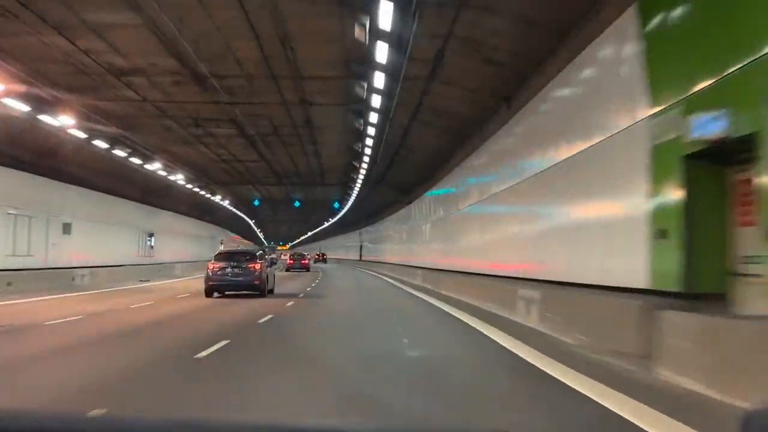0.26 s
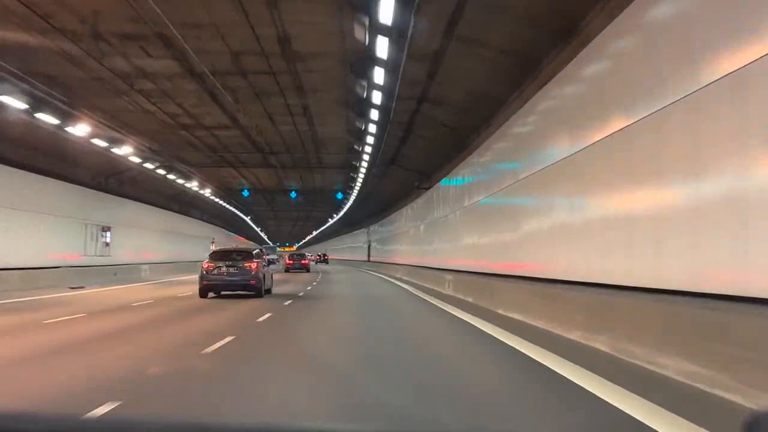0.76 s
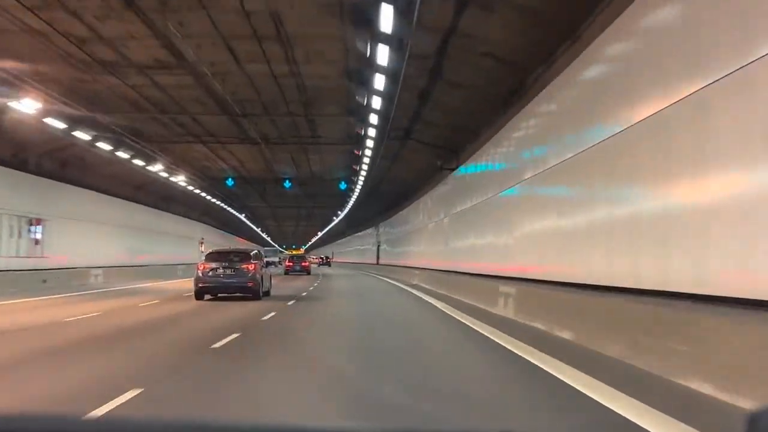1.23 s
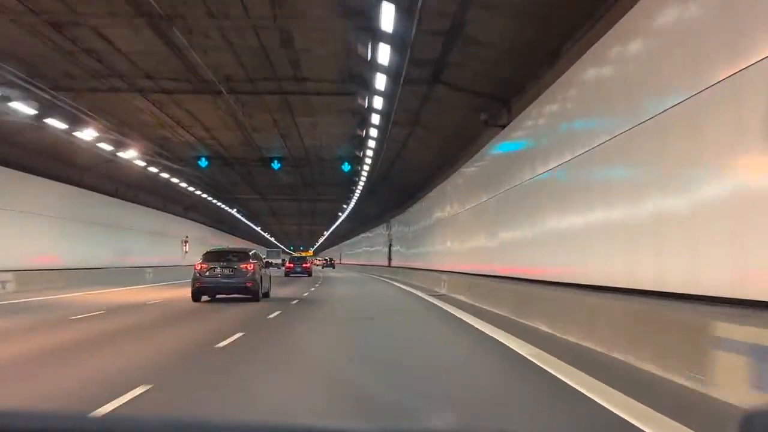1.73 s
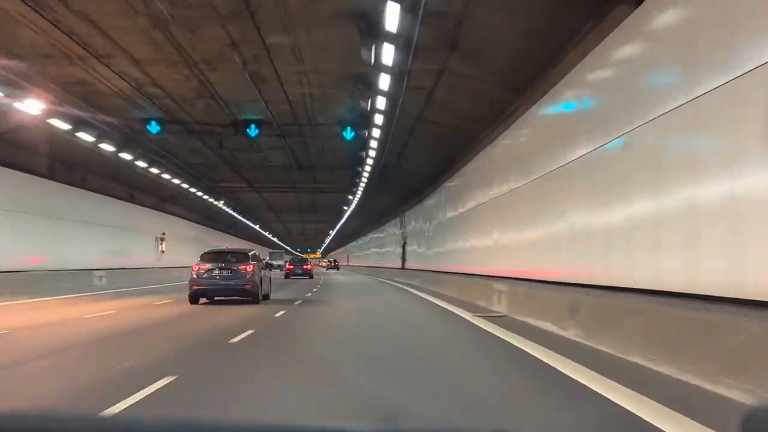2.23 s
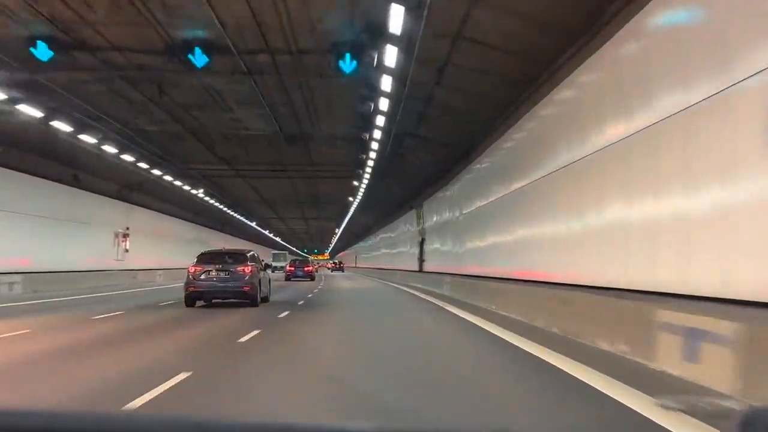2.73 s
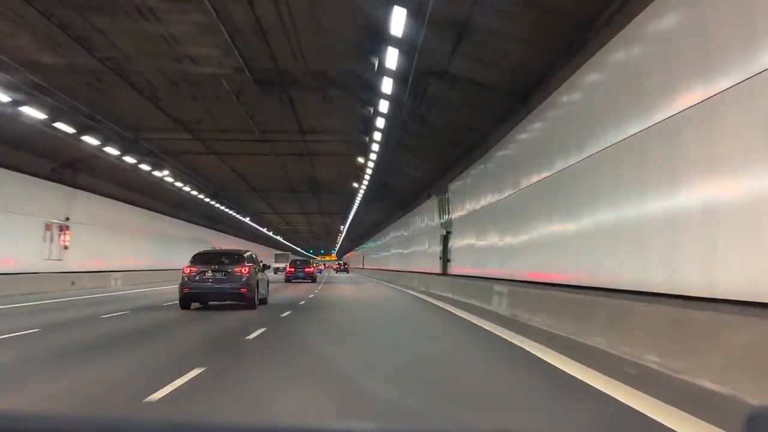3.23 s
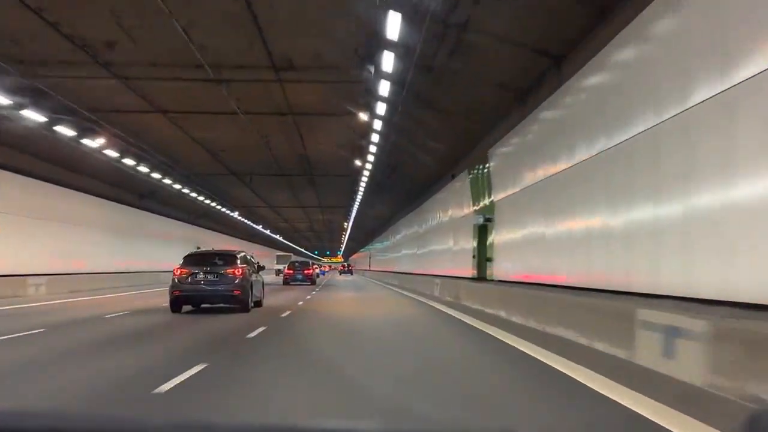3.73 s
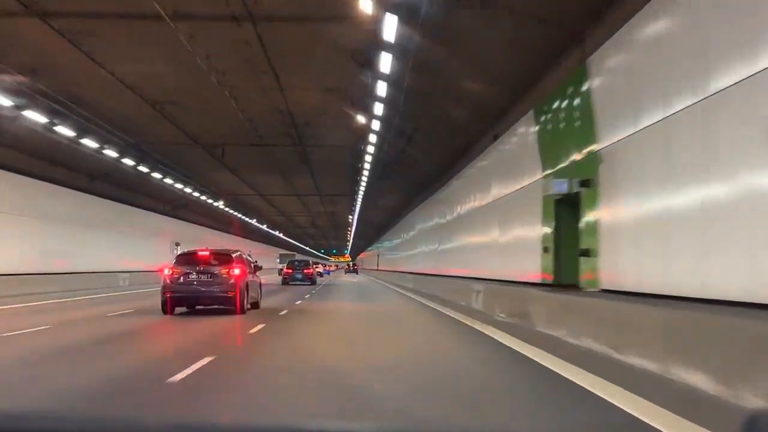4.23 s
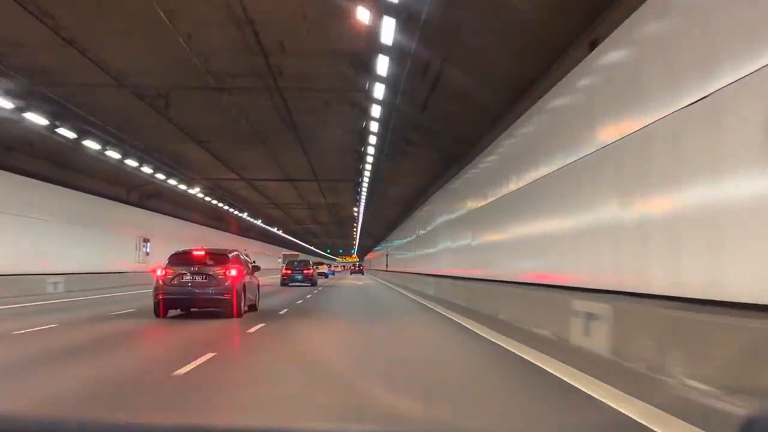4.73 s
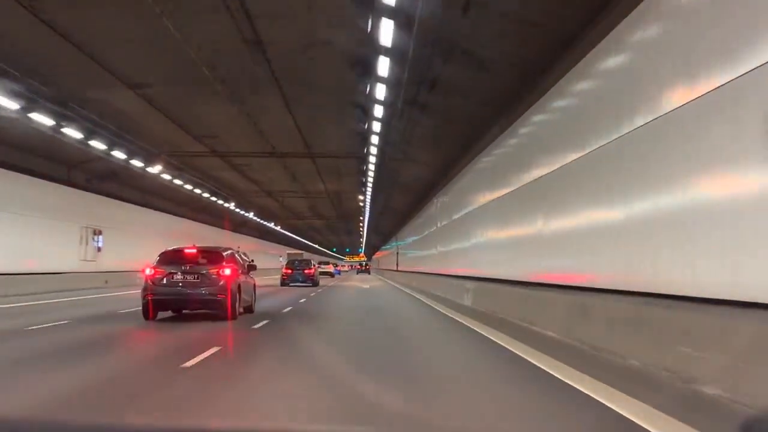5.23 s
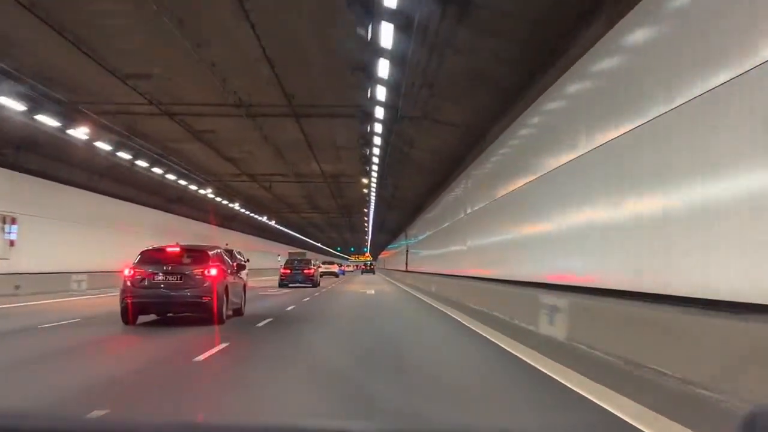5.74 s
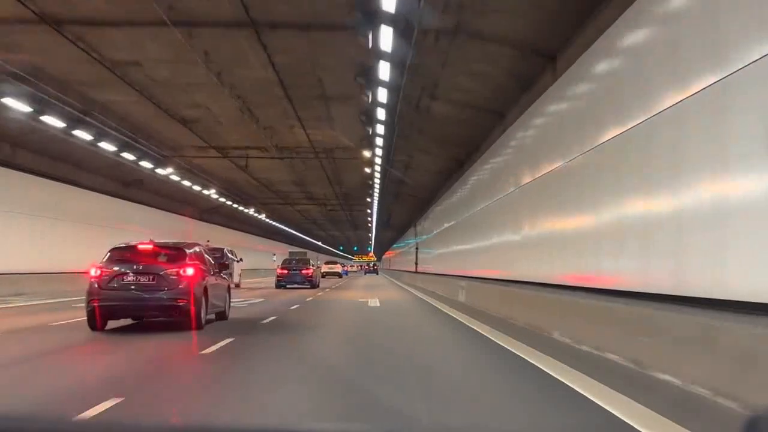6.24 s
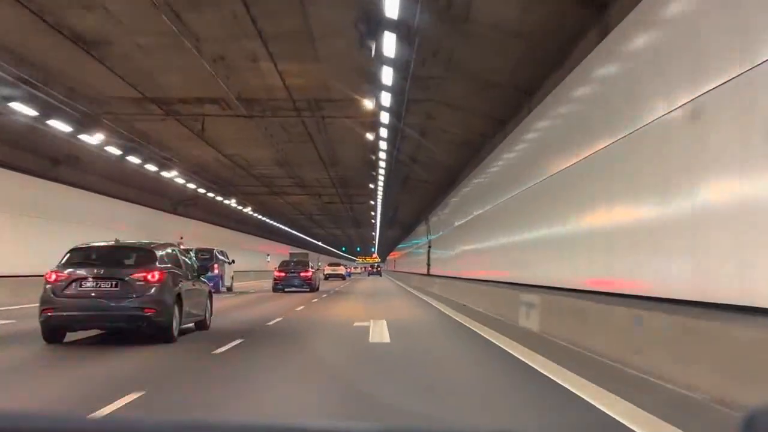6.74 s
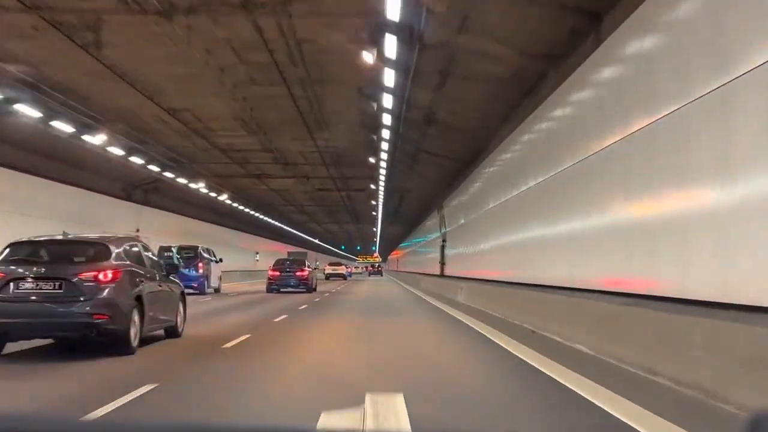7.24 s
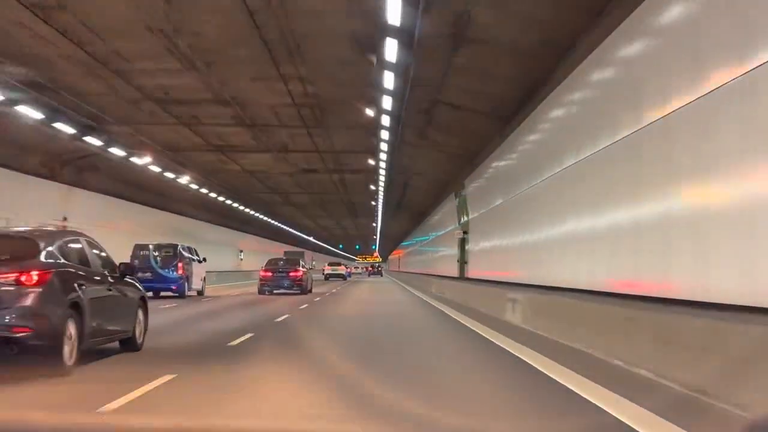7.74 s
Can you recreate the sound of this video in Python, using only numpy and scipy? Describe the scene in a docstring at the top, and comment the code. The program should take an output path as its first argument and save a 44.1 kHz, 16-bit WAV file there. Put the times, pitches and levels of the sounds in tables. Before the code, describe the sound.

Heard in stereo from inside a car driving through a tunnel: a deep, uneven tyre rumble with frequent soft thumps, a low engine drone that is strong at first and then comes and goes, and a deep cabin boom. Quieter tyre roar and windscreen air surround it. A faint thin hiss swells and drops; trim ticks softly near the five-second mark, and the hardest bump comes near the end.

```python
"""Inside a car cruising through a road tunnel, heard in stereo from within the cabin, about 8 s.
From the start rough asphalt gives a low rumble with soft thumps, over a droning engine and a cabin boom;
tyre roar enters through the glass and air rushes past the windscreen. The drone, strong at first, comes and goes.
A thin high hiss (likely the air conditioning) is faint, swells from about 3 s, and drops and returns.
Near 5 s the trim ticks softly; the hardest bump lands near 7.4 s. Noise, sines and ringing modes make it all.
"""
import sys
import numpy as np
from scipy import signal
from scipy.fft import rfft, irfft
from scipy.io import wavfile
from scipy.ndimage import uniform_filter1d

SR = 44100
rng = np.random.default_rng(int(sys.argv[2]) if len(sys.argv) > 2 else 0)


def dump(signal):
    """Clip the signal to [-1, 1] and save it as 16-bit WAV at the path in sys.argv[1]."""
    limited = np.clip(np.atleast_2d(signal).T, -1, 1)
    pcm = np.round(limited * 32767).astype(np.int16)
    wavfile.write(sys.argv[1], SR, pcm)


N = 351477
T = np.arange(N) / SR
FREQ = np.arange(N // 2 + 1) * SR / N + 1e-3  # just above zero, so that its logarithm exists
SIDES = np.array([[1], [-1]])  # left, right

# Colour of the rumble, from the suspension and from the body panels: f/Hz, relative density/dB
SUSPENSION_COLOUR = [(8, -45), (22, -28), (32, -12), (46, -1.5), (60, -1.5), (73, 1), (85, -.5),
                     (100, -2.8), (128, -4), (170, -16), (260, -40), (800, -110)]
PANEL_COLOUR = [(20, -53.5), (80, -19), (125, -8.5), (155, -2), (210, -1.5), (260, -4), (320, -8.5),
                (400, -14.5), (500, -21.5), (650, -38), (1200, -71.5), (3000, -110)]
# Rumble on ordinary asphalt; the tyres take a moment to roll on to a stretch or off it
SUSPENSION_DB, PANEL_DB, ROLL_ON_S = -19, -26.5, 0.029
# Coarser or smoother asphalt: start t/s, length/s, extra suspension level/dB, extra panel level/dB
ASPHALT_STRETCHES = [(0.0, 0.24, 1.5, 0.5), (.31, 0.05, -5, -0.5), (0.584, 0.093, -3.5, -1),
                     (0.74, 0.18, 2.5, 1), (.96, 0.49, -1, 0.5), (1.572, .07, -7, 1), (1.78, 0.46, 1, .5),
                     (2.534, 0.043, -3, -4), (2.71, 0.23, 1, 0.5), (2.969, 0.049, -13, -2.5),
                     (3.05, 0.11, 0.5, -2.5), (3.754, 0.058, -7, -1.5), (3.903, 0.34, 0, 1.5),
                     (4.394, 0.059, -2.5, -1), (4.74, .05, -3, -1), (4.79, 0.044, 5.5, -1),
                     (4.962, 0.185, 4, 0), (5.153, 0.15, -4, -1.5), (5.453, 0.18, 0, 1),
                     (5.817, 0.34, 1, 0), (6.072, .12, -5.5, -0.5), (6.255, 0.56, 0, 1),
                     (6.895, 0.43, -1, -1), (7.368, 0.077, -6.5, 0.5), (7.657, 0.064, -2.5, -0.5)]
# Bumps in the asphalt: t/s, peak level before gain/dB, relative sharpness/dB
ASPHALT_BUMPS = [(0.034, -15, -17.5), (0.075, -16.5, -11), (0.129, -18, -20), (0.257, -15, -24),
                 (0.39, -16.5, -5), (0.519, -12, -21), (0.544, -14, -7), (0.718, -18.5, -7),
                 (0.828, -14.5, -19), (1.093, -12, -15.5), (1.165, -23, -5.5), (1.498, -17, -12.5),
                 (1.785, -14, -19), (1.81, -15, -15), (1.933, -19, -21), (2.053, -16, -29.5),
                 (2.128, -16.5, -24.5), (2.171, -14.5, -13.5), (2.437, -13.5, -27.5), (2.531, -15.5, -16),
                 (2.626, -13.5, -24), (2.804, -16.5, -24), (2.914, -15.5, -23), (3.023, -19, -17.5),
                 (3.142, -16, -23.5), (3.251, -15.5, -14), (3.427, -14.5, -29), (3.483, -18, 1),
                 (3.665, -17.5, -6), (3.693, -17.5, -22.5), (3.945, -16, -13), (4.002, -16, -8),
                 (4.092, -13.5, -23), (4.193, -15, -21.5), (4.252, -16, -15.5), (4.442, -16, -24.5),
                 (4.532, -17.5, -4.5), (4.679, -17.5, -23), (4.832, -21, -25.5), (4.895, -18.5, -4.5),
                 (4.98, -17.5, -14), (5.071, -13.5, -18), (5.124, -16.5, -25), (5.184, -14, -24.5),
                 (5.283, -14, -16.5), (5.518, -15, -22), (5.617, -17, -23.5), (5.944, -17, -4.5),
                 (6.198, -16, -26.5), (6.244, -16.5, -17), (6.275, -14.5, -13.5), (6.457, -16.5, -10.5),
                 (6.564, -12, -23.5), (6.684, -17, -4.5), (6.943, -14, -2.5), (7.054, -21, 0.5),
                 (7.085, -13.5, -25), (7.186, -18, -14), (7.195, -11, -23), (7.274, -14, -24),
                 (7.419, -7.3, -9.5), (7.556, -15.5, -5), (7.638, -13.5, -17), (7.832, -16, -25)]
# Damped modes of the car body, before detuning and tilt: f/Hz, 60 dB decay time/s, level/dB
BODY_MODES = [(98, 0.07, -9.5), (150.3, 0.059, 2), (203.6, 0.073, 0), (271.7, 0.041, -1.5),
              (366.5, 0.042, -5), (496, 0.03, -15), (620, 0.037, -28)]
# Humps that jolt the suspension: t/s, level before gain/dB, swing f/Hz
ROAD_HUMPS = [(0.165, -15, 73.4), (0.25, -10, 72.7), (0.381, -14, 73.4), (0.744, -12, 94.2),
              (0.816, -7, 74), (2.062, -17, 86.1), (2.327, -9, 96), (2.434, -8, 71), (2.736, -10, 100.5),
              (2.841, -12, 83), (3.941, -11, 72.7), (3.993, -12, 87), (4.107, -10, 121),
              (4.363, -11.5, 113), (4.785, -8.5, 110), (4.829, -12, 88.8), (4.974, -7, 72.7),
              (5.488, -8, 71), (5.831, -10.5, 105), (5.9, -16, 104), (5.944, -12, 88), (6.313, -7, 85),
              (6.362, -8, 72), (6.545, -15, 84), (6.758, -12, 96), (6.968, -11, 105), (7.083, -9.5, 96),
              (7.332, -12.5, 96), (7.876, -11.5, 105)]
HUMP_RISE_S = 0.016  # from the start of a jolt to its fullest swing
# Engine drone: t/s, level before gain and throb/dB
ENGINE_LEVEL = [(0, -14.5), (.55, -17), (.64, -24), (.8, -17), (.98, -12.5), (1.13, -17.5), (1.3, -15),
                (1.58, -14), (1.72, -26), (2.05, -26.5), (2.2, -16.5), (2.65, -26), (2.9, -16.5),
                (3.02, -26.5), (3.55, -19), (3.72, -41), (4.3, -20), (4.85, -23.5), (5.12, -14),
                (5.17, -31), (5.46, -13), (5.8, -28), (6.03, -16), (6.25, -24.5), (6.7, -20.5),
                (7.2, -21.5), (7.5, -27), (7.97, -24.5)]
# Firing rate of the engine: t/s, f/Hz
ENGINE_PITCH = [(0, 62.5), (.6, 62.2), (1, 60.8), (1.45, 60.5), (1.7, 58.5), (2.2, 62), (2.6, 60),
                (3.5, 58.5), (4.2, 62), (5.05, 62), (5.3, 57.5), (5.6, 58.5), (6, 63.5), (6.4, 62),
                (7.97, 61)]
# Cabin boom: t/s, level before gain and throb/dB
BOOM_LEVEL = [(0, -29), (.95, -27), (1.8, -35), (2.45, -25), (2.9, -37), (3.7, -25), (4.75, -30),
              (6.05, -25.5), (7.97, -27.5)]
# Pitch of the cabin boom: t/s, f/Hz
BOOM_PITCH = [(0, 37.5), (3.5, 36), (7.97, 36)]
# Tunnel roar alike on both sides, and differing between them: f/Hz, relative density/dB
ROAR_COMMON_COLOUR = [(60, -42.5), (250, -9), (480, 4.5), (550, 3), (605, -1.5), (670, 1.5), (745, 1),
                      (795, -1.5), (890, 0.75), (1010, -4), (1160, -5), (1270, -6.5), (1470, -13.5),
                      (1560, -13), (2000, -19), (3000, -40.5), (9000, -82)]
ROAR_DIFFERENCE_COLOUR = [(20, -7.5), (38, 7), (80, 16), (130, 12), (260, 6), (295, 9), (350, 2), (480, 0),
                          (560, 2), (690, -5), (780, -1.5), (900, -6), (1050, -6), (1200, -16),
                          (1500, -21.5), (2100, -46.5), (3200, -33.5), (5500, -58.5), (7800, -32.5),
                          (11000, -66)]
# Air round the windscreen: f/Hz, relative density/dB
WINDSCREEN_COLOUR = [(300, -42), (1200, -13), (1700, -0.5), (2050, -2.5), (2270, 2.5), (2650, -3.5),
                     (3200, -8), (3500, -10), (3850, -16), (5000, -18.5), (5800, -17), (6500, -16),
                     (7550, -24), (8200, -52), (10000, -28.5), (12400, -38.5)]
AIR_DB = -52.5  # steady but for the light buffeting
# Spells of hiss, most of them building: start t/s, starting level before gain/dB, growth/(dB per s)
HISS_SPELLS = [(0, -62, -2.5), (.7, -65, 0.3), (3.25, -66.5, 5.5), (4.24, -72.5, 10.5), (4.98, -63, 4.3),
               (5.84, -63, 1), (6.39, -68.5, 3), (7.85, -74, 0)]
HISS_DROP_S = 0.027  # how long a step between spells takes
# Whistling resonances of the hiss: f/Hz, width before squaring/Hz, level/dB, phase lead of left over right/rad
WHISTLE_MODES = [(9227, 176, 4, 1.67), (9370, 110, -7, 0.9), (9610, 170, -6.5, 0.7),
                 (10300, 520, -21.5, .4), (11000, 220, -19.5, .1), (11290, 260, -13, .1),
                 (12200, 500, -28.5, 0.044)]
# Slips of the trim: t/s, relative level/dB, tilt/(dB per octave)
TRIM_SLIPS = [(4.929, -35, -13), (4.955, -38.5, -2), (4.957, -40, -1), (5.113, -42, -2),
              (5.120, -29.5, -12)]
# Resonances of the trim panel: f/Hz, width before squaring/Hz, level before tilt/dB
TRIM_MODES = [(1400, 500, 0), (2700, 1300, -4), (4100, 1200, -2), (5300, 1000, 2.5), (6750, 700, -1.5)]
TICK_DECAY_S = 0.0018  # time constant of a crack
TOP_HZ = 12450  # upper limit of the recorder


def undb(db):
    """Decibels to gain."""
    return 10 ** (np.asarray(db) / 20)


def unit(x):
    """Scale to rms 1."""
    return x / np.sqrt(np.mean(x ** 2))


def curves(table):
    """Each column of a table as one value a sample."""
    s, *columns = np.transpose(table)
    return [np.interp(T, s, column) for column in columns]


def colour(x, points):
    """Filter by a response drawn through (Hz, dB) points on a logarithmic frequency axis."""
    hz, db = np.transpose(points)
    response = undb(np.interp(np.log(FREQ), np.log(hz), db))
    return irfft(rfft(x) * response, N)


def resonance(hz, width_hz):
    """Band-pass response, gain 1 at the centre."""
    return 1 / (1 + 1j * (FREQ ** 2 - hz ** 2) / (FREQ * width_hz))


def noise():
    """White noise."""
    return rng.standard_normal(N)


def walk(rate):
    """Smooth random wander of spread 1, changing about rate times a second."""
    return unit(irfft(rfft(noise()) * np.exp(-(FREQ / rate) ** 2), N))


def smooth(x, span_s):
    """Moving average over a span of time."""
    return uniform_filter1d(x, max(int(span_s * SR), 2))


def even(x, span_s):
    """Signal with its slow swells evened out, rms about 1."""
    return x / np.sqrt(smooth(x ** 2, span_s) + 1e-12)


def rumble(patchy_db):
    """Tyres on uneven asphalt shake the suspension and, in quick patches, the panels; coarse stretches add level."""
    extra = np.zeros((2, N))
    for s, length, suspension_db, panel_db in ASPHALT_STRETCHES:
        on_stretch = (T >= s) & (T < s + length)
        extra += np.outer([suspension_db, panel_db], on_stretch)
    suspension_extra, panel_extra = smooth(extra, ROLL_ON_S)
    suspension = even(colour(noise(), SUSPENSION_COLOUR), span_s=0.1)
    patches = noise() * undb(patchy_db * walk(rate=65))
    panels = even(colour(patches, PANEL_COLOUR), span_s=0.12)
    return suspension * undb(SUSPENSION_DB + suspension_extra) + panels * undb(PANEL_DB + panel_extra)


def bumps(gain_db, contact_s, bluntness, tilt, detune):
    """A bump pushes through the tyre and rings damped body modes; sharp edges push briefly and favour upper modes."""
    out, t = np.zeros(N + SR), T[:SR // 5]
    hz, t60, db = np.transpose(BODY_MODES)[:, :, None]
    octaves = np.log2(hz / hz.mean())
    usual_db = np.mean(ASPHALT_BUMPS, axis=0)[2]
    chances = rng.standard_normal((len(ASPHALT_BUMPS), len(hz), 1))
    for (s, peak_db, sharp_db), chance in zip(ASPHALT_BUMPS, chances):
        mode_db = db + tilt * (sharp_db - usual_db) * octaves
        push_s = contact_s * undb(bluntness * (usual_db - sharp_db))
        mode_hz = hz * (1 + detune * chance)
        decay = undb(mode_db - 60 * t / t60)
        ring = np.sum(decay * np.sin(2 * np.pi * mode_hz * (t - push_s)), axis=0)
        ring *= 1 - np.exp(-(t / push_s) ** 2)  # soft onset while the tyre pushes
        start = int(s * SR)
        out[start:start + len(t)] += ring / np.abs(ring).max() * undb(peak_db + gain_db)
    return out[:N]


def humps(gain_db):
    """A hump sets the suspension swinging for a few cycles: a soft, deep thud."""
    out, t = np.zeros(N + SR), T[:SR // 5]
    swing = (t / HUMP_RISE_S * np.exp(1 - t / HUMP_RISE_S)) ** 2
    phases = rng.uniform(0, 2 * np.pi, len(ROAD_HUMPS))
    for (s, level_db, hz), phase in zip(ROAD_HUMPS, phases):
        thud = swing * np.sin(2 * np.pi * hz * t + phase)
        start = int(s * SR)
        out[start:start + len(t)] += thud * undb(level_db + gain_db)
    return out[:N]


def drone(level_table, pitch_table, gain_db, waver, throb_db, throb_rate):
    """Engine or cabin boom: a low sine that throbs unevenly and whose phase wavers (in radians)."""
    (db,), (hz,) = curves(level_table), curves(pitch_table)
    phase = 2 * np.pi * np.cumsum(hz) / SR + waver * walk(rate=8)
    throb = even(undb(throb_db * walk(throb_rate)), span_s=0.57)
    return np.sqrt(2) * np.sin(phase) * throb * undb(db + gain_db)


def roar(mid_db, side_db, lean_db, swell_db):
    """Diffuse tyre noise of the tunnel enters through the glass all round, a little more by the left windows."""
    mid = unit(colour(noise(), ROAR_COMMON_COLOUR)) * undb(mid_db + swell_db * walk(rate=2.1))
    side = unit(colour(noise(), ROAR_DIFFERENCE_COLOUR)) * undb(side_db + swell_db * walk(rate=5.4))
    window = irfft(rfft(mid) * np.abs(resonance(hz=750, width_hz=870)) ** 2, N)
    return mid + SIDES * (side + undb(lean_db) * window)


def air(skew, gust_db):
    """Air rushes past the windscreen ahead, lightly buffeted; round 3.5 kHz the left channel leads in phase."""
    rush = rfft(unit(colour(noise(), WINDSCREEN_COLOUR)))
    lead = skew * np.abs(resonance(hz=3500, width_hz=2200)) ** 4  # radians each way
    return irfft(rush * np.exp(1j * lead * SIDES), N) * undb(AIR_DB + gust_db * walk(rate=20))


def hiss(gain_db, flutter_db):
    """A sputtering flow through a narrow opening whistles in high resonances; most spells build, then drop fast."""
    flow = rfft(even(noise() * undb(flutter_db * walk(rate=20)), span_s=0.3))
    response = 0
    for hz, width, db, lead in WHISTLE_MODES:
        whistle = undb(db) * np.abs(resonance(hz, width)) ** 2
        response = response + whistle * np.exp(.5j * lead * SIDES)  # half the lead each way
    level = np.full(N, float(HISS_SPELLS[0][1]))
    for s, db, growth in HISS_SPELLS:
        level = np.where(T >= s, db + growth * (T - s), level)
    level = smooth(level, HISS_DROP_S)
    return unit(irfft(flow * response, N)) * undb(level + gain_db)


def ticks():
    """Plastic trim slips in tiny jerks, each a dry crack of noise coloured by the panel's resonances."""
    out = 0
    for s, level_db, tilt_db in TRIM_SLIPS:
        crack = (T >= s) * np.exp(-np.abs(T - s) / TICK_DECAY_S) * noise()
        panel = 0
        for hz, width, db in TRIM_MODES:
            mode_db = db + tilt_db * np.log2(hz / TRIM_MODES[0][0])
            panel = panel + undb(mode_db) * np.abs(resonance(hz, width)) ** 2
        out = out + undb(level_db) * irfft(rfft(crack) * panel, N)
    return out


def scene():
    """Body-borne sound is nearly alike in both channels, slightly stronger at the left; the roar is wide."""
    road = rumble(patchy_db=1.8)
    road = road + bumps(gain_db=3.0, contact_s=0.00574, bluntness=0.21, tilt=0.56, detune=0.09)
    road = road + humps(gain_db=-3.0)
    engine = drone(ENGINE_LEVEL, ENGINE_PITCH, gain_db=-1.0, waver=0.21, throb_db=1.0, throb_rate=7.7)
    boom = drone(BOOM_LEVEL, BOOM_PITCH, gain_db=2.0, waver=0.24, throb_db=1.0, throb_rate=4.3)
    road_left_db, drone_left_db = 0.55, 0.3  # up at the left, down as much at the right
    cabin = road * undb(road_left_db * SIDES) + (engine + boom) * undb(drone_left_db * SIDES) + ticks()
    outside = roar(mid_db=-41.0, side_db=-34.0, lean_db=-13.0, swell_db=0.53) + air(skew=0.34, gust_db=0.43)
    return cabin + outside + hiss(gain_db=5.5, flutter_db=1.5)


def record(dry):
    """The recorder cuts the top with a steep low-pass."""
    low_pass = signal.ellip(8, .2, 70, TOP_HZ, fs=SR, output="sos")
    return signal.sosfilt(low_pass, dry)


dry = scene()
out = record(dry)
dump(out)
```